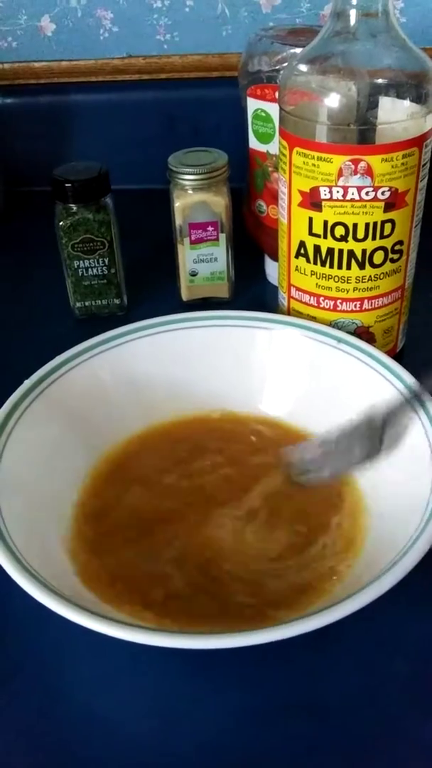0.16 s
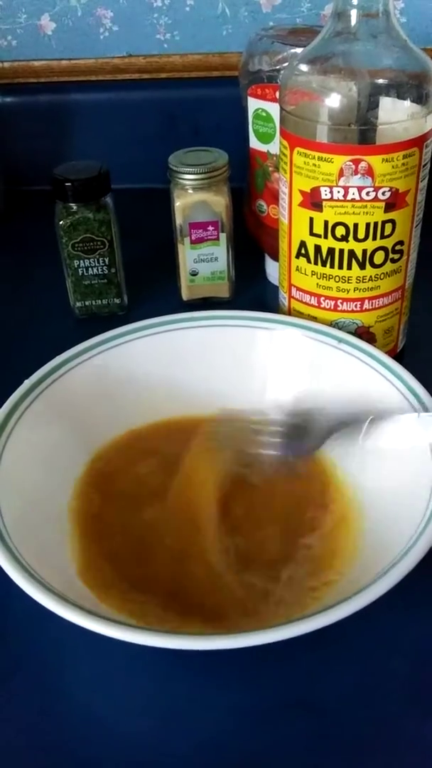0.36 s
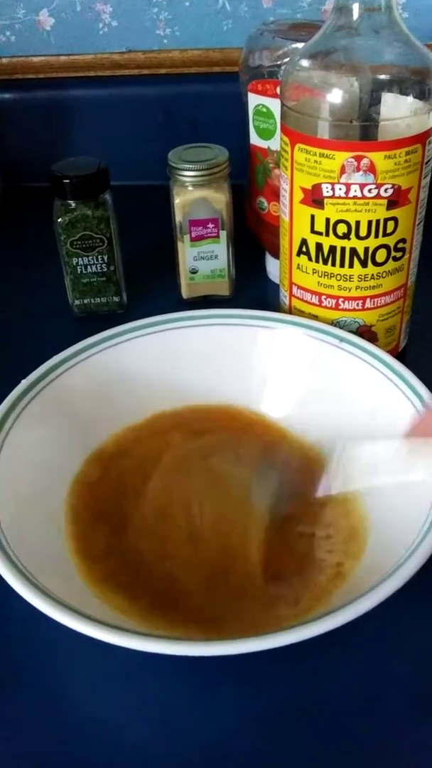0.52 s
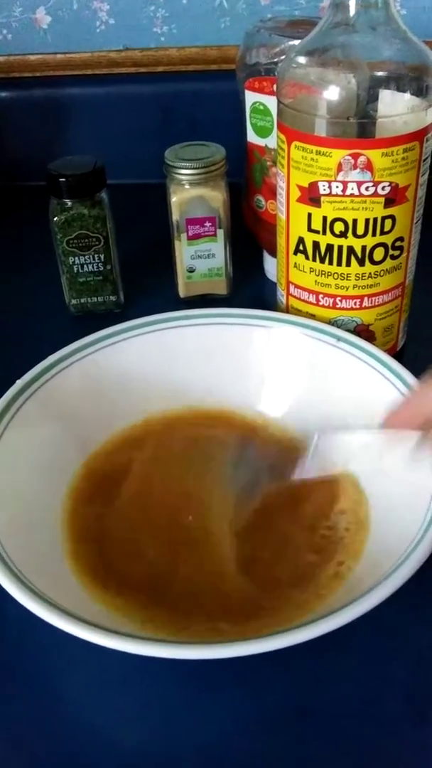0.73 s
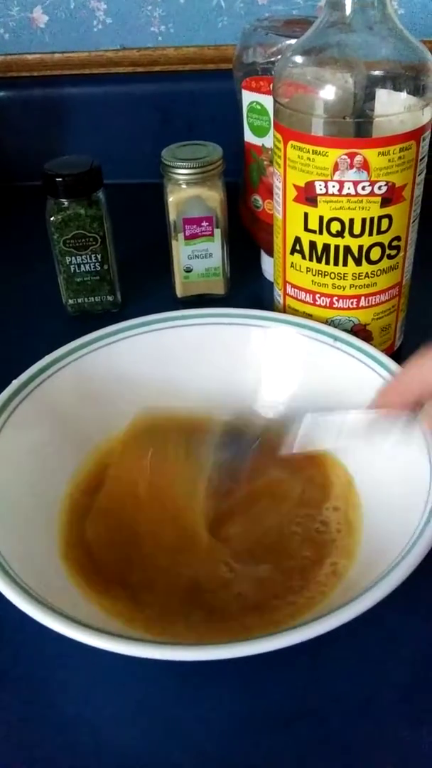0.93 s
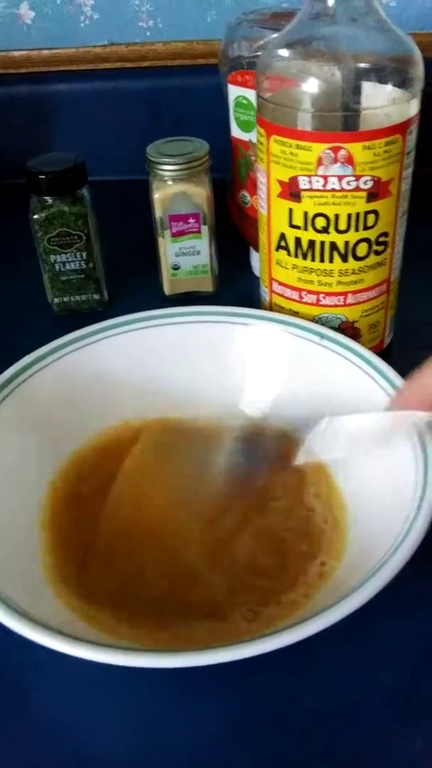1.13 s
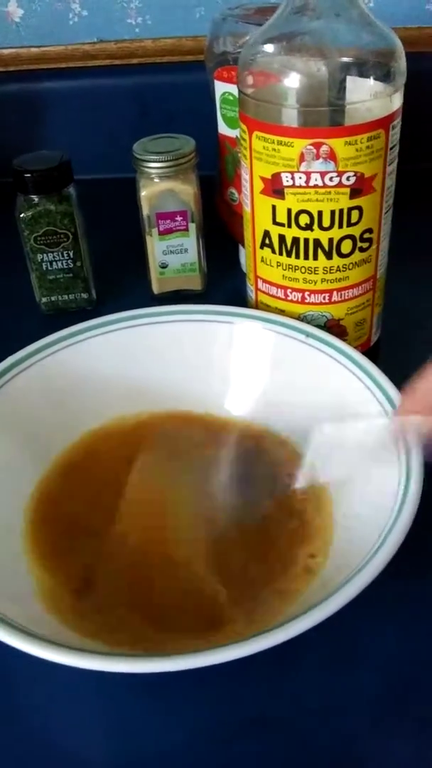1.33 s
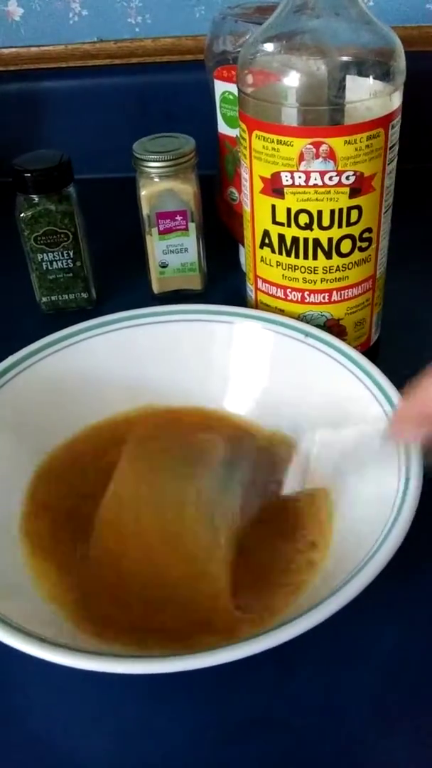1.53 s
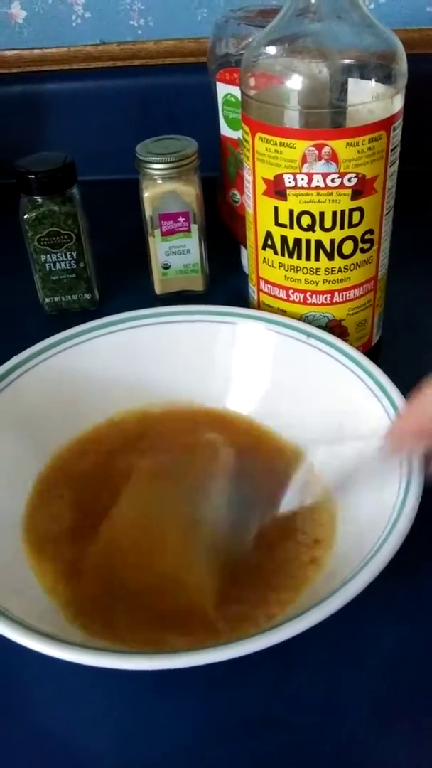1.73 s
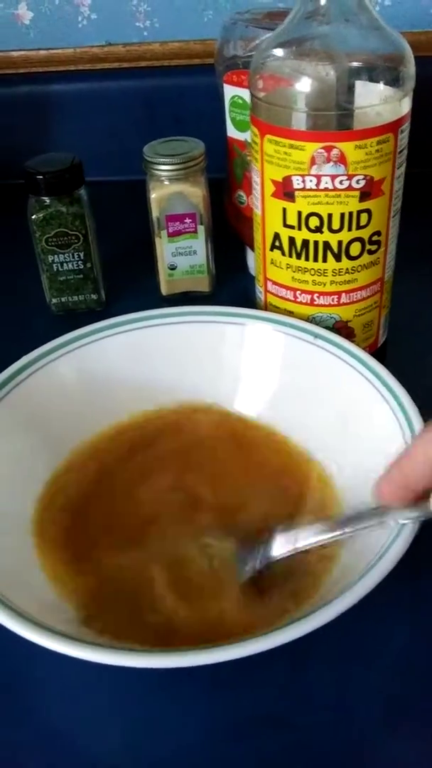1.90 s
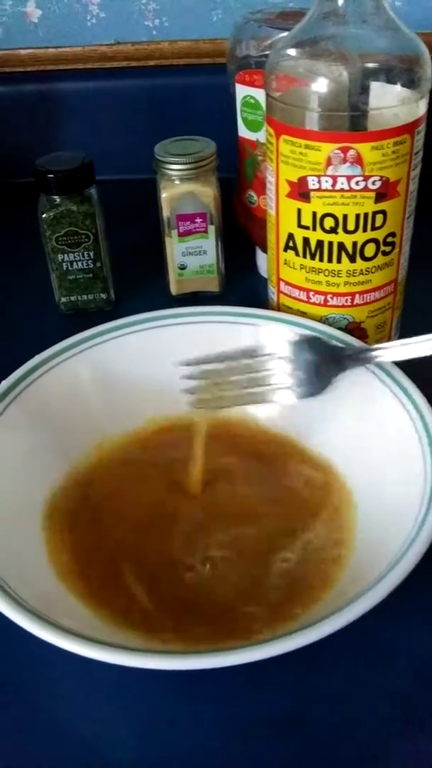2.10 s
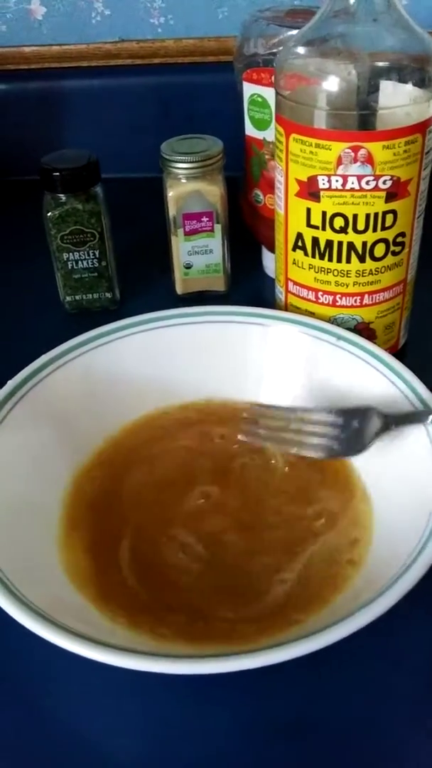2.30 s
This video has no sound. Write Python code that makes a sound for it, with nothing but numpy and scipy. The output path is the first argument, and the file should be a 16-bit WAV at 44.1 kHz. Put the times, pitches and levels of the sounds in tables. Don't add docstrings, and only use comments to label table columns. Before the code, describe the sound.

A metal fork briskly beats eggs in a bowl, clacking and scraping five times a second

```python
import sys
import numpy as np
from scipy import signal
from scipy.fft import rfft, irfft, next_fast_len
from scipy.io import wavfile
from scipy.ndimage import map_coordinates

SR = 44100
rng = np.random.default_rng(int(sys.argv[2]) if len(sys.argv) > 2 else 0)


def amplitude_ratio(level_db):
    exponent = np.asarray(level_db, float) / 20
    return 10 ** exponent


def output_pcm(signal):
    pcm = np.clip(np.atleast_2d(signal).T, -1, 1) * 32767
    wavfile.write(sys.argv[1], SR, np.round(pcm).astype(np.int16))


N = 103635

# length in seconds, pressure in dB at start, pressure in dB at end,
# brightness in dB, tine tips in dB.
SCRAPES = [
    (0.079, -33.5, -37.5, 2, 0),
    (0.075, -27, -40.5, -3, 6),
    (0.073, -25.5, -38.5, 0.5, -7),
    (0.052, -26.5, -34.5, 2, -9.5),
    (0.053, -29, -41, 1.5, -0.5),
    (.088, -32, -40.5, 1.5, 1.5),
    (0.067, -29.5, -39, -1, 2.5),
    (0.08, -37, -34, 3.5, 0.5),
    (0.085, -37, -37, 0, 5),
]
LEAD_IN_S = [.4135, .6045, .800, 1.002, 1.198, 1.4098, 1.617, 1.8203]
# pressure in dB, brightness in dB.
LEAD_INS = [
    (-38, 3),
    (-32.5, -1.5),
    (-53.5, -13),
    (-32, 2.5),
    (-34.5, -4.5),
    (-37.5, -5.5),
    (-29.5, 0),
    (-26, -3.5),
]
# centre in Hz, width in Hz, level in dB.
RUBBED_BOWL = [(1169, 300, -1), (1520, 140, -2.5), (2100, 67, 4.5), (2440, 390, -9), (3148, 900, -7)]
# centre in Hz, width in Hz, level in dB.
RUBBED_TINES = [(4850, 680, -13), (5715, 84, 0.5), (6555, 88, -11.5), (6110, 840, -5), (7250, 410, -3)]
# centre in Hz, width in Hz, level in dB.
RUBBED_TIPS = [(8450, 240, -9.5), (10020, 540, -11), (11900, 440, -6.5), (13070, 510, -14),
               (14700, 1400, -19.5)]
# frequency in Hz, t60 in seconds.
KITCHEN_T60_S = [(300, 0.86), (2000, 0.38), (7300, .3), (8500, 0.3), (15000, 0.25)]
# frequency in Hz, level in dB.
HUM_SPECTRUM = [(30, 1.5), (150, -16), (230, 1), (420, -0.5), (950, -3.5), (1500, -13.5), (4000, -21.5),
                (15500, -30.5)]
BLOW_S = [.2072, .4206, .6177, .8143, 1.0153, 1.2061, 1.4182, 1.6246, 1.8309]
# tines in dB, bowl rim in dB, wall in dB, foot in dB, counter thump in dB.
BLOW_LEVELS = [
    (-10.5, -27, -35.5, -45.5, -32),
    (0, -23.5, -18.5, -14.5, -18.5),
    (-1.5, -18.5, -23.5, -31.5, -15.5),
    (1, -24.5, -32, -36, -18.5),
    (-6.5, -28.5, -26.5, -53, -21),
    (-1, -26.5, -20.5, -31.5, -20.5),
    (-1.5, -33.5, -21.5, -29, -22.5),
    (-2.5, -21.5, -25, -37.5, -21.5),
    (-3.5, -26.5, -25.5, -39, -20),
]
# centre in Hz, width in Hz, level in dB.
CRACK_PEAKS = [(1300, 440, -13), (2950, 790, -4), (6100, 9000, -11), (12000, 5000, -12)]
# frequency in Hz, level in dB, t60 in seconds.
TINE_MODES = [(4624, 1.5, 0.013), (4980, -1.5, 0.012), (5850, -5.5, 0.036), (6125, 9, 0.013),
              (6670, -2, 0.023), (7104, 0, 0.017), (7550, -11.5, 0.037), (8700, -13.5, .015),
              (9460, -10.5, 0.01), (9970, -15, 0.017), (12050, -6, .015), (13360, -13, .012),
              (14600, -3, .01)]
# frequency in Hz, level in dB, t60 in seconds.
RIM_MODES = [(1010, -13, .06), (1120, -7, .075), (1250, 0, .07), (1300, -5, .06), (1560, -6, .095)]
# frequency in Hz, level in dB, t60 in seconds.
WALL_MODES = [(2000, -9, .075), (2115, -9, .07), (2380, -10, .055), (2505, -2, .07), (2630, 0, .075),
              (2820, -11, .06)]
# frequency in Hz, level in dB, t60 in seconds.
FOOT_MODES = [(3340, -7, .06), (3450, -1, .09), (3520, 0, .1), (3600, -1, .085)]
# frequency in Hz, level in dB, t60 in seconds.
THUMP_MODES = [(385, 0, .05), (412, -4, .04)]
TOUCH_S = [.2225, .237, .2565, .271, .2745, .281, .285, .468, .481, .557, .608, 1.276, 1.287, 1.394, 1.4098,
           1.483, 1.689, 1.700, 1.8955, 1.902, 1.912]
# level in dB, brightness in dB.
TOUCH_LEVELS = [(-29, 8), (-35.5, 5.5), (-39.5, 5.5), (-44.5, 4.5), (-25.5, 8), (-31, 9.5), (-34, 5),
                (-33, 6.5), (-33, 5.5), (-36.5, -3), (-22.5, 0), (-36.5, 15), (-35.5, 7), (-58, 7),
                (-21, 0.5), (-29.5, 6), (-37, 10), (-56, 10), (-34.5, 10.5), (-36, 7), (-45, 3)]
# start in seconds, level in dB, pitch in Hz.
BUBBLES = [(1.137, -43, 850), (1.6, -47, 1300), (1.773, -40, 850), (1.783, -40, 700), (1.791, -39, 620),
           (1.7975, -36, 4450), (2.038, -41, 1550), (2.039, -50, 2700), (2.058, -44, 950),
           (2.134, -41, 1130), (2.135, -49, 4900), (2.326, -43, 600)]

RUB_RISE_S, RUB_FALL_T60_S = 0.0017, 0.08
GRIT_DB, RUB_FLUTTER_DB, CLUMP_DB, ANGLE_DB = 2.8, 1.6, 3.2, 2.5
SAG_DB = 2
EARLIER_DB = -43
KITCHEN_DB, KITCHEN_GAP_S = -13, 0.004
HUM_DB = -56
PLACE_DB = 2.5
SLOSH_RAD = 1.7
CRACK_DB, CRACK_T60_S = 11, 0.0018
THUMP_RISE_S = 0.004
TOUCH_DAMPING = 0.9
BUBBLE_CYCLES, BUBBLE_RISE = 12, 0.06
MIC_LOW_HZ, MIC_TOP_HZ = 200, 15900


def unit(x):
    return x / np.sqrt(np.mean(x ** 2) + 1e-20)


def along(points, hz):
    f, v = np.transpose(points)
    return np.interp(np.log(hz + 1), np.log(f + 1), v)


def wobble(rate_hz):
    knots = rng.standard_normal(int(N * rate_hz / SR) + 4)
    return map_coordinates(knots, [np.arange(N) * rate_hz / SR])


def filtered(x, response):
    m = next_fast_len(N + SR // 2)
    return irfft(rfft(x, m) * response(np.fft.rfftfreq(m, 1 / SR)), m)[..., :N]


def resonant(x, peaks):
    def response(f):
        total = 0
        for k, (centre_hz, width_hz, db) in enumerate(peaks):
            loss = 1j * f * width_hz
            total = total + (-1) ** k * amplitude_ratio(db) * loss / (centre_hz ** 2 - f * f + loss)
        return total
    return filtered(x, response)


def add(track, start_s, sound):
    track[round(start_s * SR):][:len(sound)] += sound


def scrapes():
    t = np.arange(N) / SR
    parts = (RUBBED_BOWL, RUBBED_TINES, RUBBED_TIPS)
    slides = [(-0.037, 0.026, EARLIER_DB, EARLIER_DB, 1, -5)]
    slides += [(s, *row) for s, row in zip(BLOW_S, SCRAPES)]
    for s, end_s, (db, bright_db) in zip(LEAD_IN_S, BLOW_S[1:], LEAD_INS):
        slides.append((s, end_s - s, db, db - 8, bright_db, -3))

    drives = np.zeros((len(parts), N))
    for s, length_s, start_db, end_db, bright_db, tips_db in slides:
        u = t - s
        progress = np.clip(u / length_s, 0, 1)
        db = start_db + (end_db - start_db) * progress - SAG_DB * np.sin(np.pi * progress)
        db -= 60 * np.clip(u - length_s, 0, 9) / RUB_FALL_T60_S
        pressure = amplitude_ratio(db) * np.clip(u / RUB_RISE_S, 0, 1)
        drives += pressure * amplitude_ratio([[-bright_db], [bright_db], [bright_db + tips_db]])

    out = 0
    grit = unit(amplitude_ratio(GRIT_DB * wobble(900) + RUB_FLUTTER_DB * wobble(120)))
    for pressure, peaks in zip(drives, parts):
        for peak in peaks:
            noise = rng.standard_normal(N)
            clumps = unit(noise * amplitude_ratio(CLUMP_DB * wobble(59.82) + ANGLE_DB * wobble(6.78)))
            out = out + resonant(3 * pressure * grit * clumps, [peak])
    return out


def kitchen(x):
    out = np.zeros(N + 2 * SR)
    edges = [0] + [round((s - 0.03) * SR) for s in BLOW_S[1:]] + [N]
    for a, b in zip(edges, edges[1:]):
        hz, t, z = signal.stft(rng.standard_normal(SR // 2), SR, nperseg=256)
        decay = amplitude_ratio(-60 * t / along(KITCHEN_T60_S, hz)[:, None])
        tail = signal.istft(z * decay, SR, nperseg=256)[1]
        add(out, a / SR + KITCHEN_GAP_S, signal.fftconvolve(x[a:b], tail / np.linalg.norm(tail)))
    return amplitude_ratio(KITCHEN_DB) * out[:N]


def hum():
    air = unit(filtered(rng.standard_normal(N), lambda hz: amplitude_ratio(along(HUM_SPECTRUM, hz))))
    return amplitude_ratio(HUM_DB + 0.8 * wobble(5.2)) * air


def ring(modes, t, damping=1):
    hz, db, t60_s = np.transpose(modes)[:, :, None]
    luck = rng.standard_normal((len(modes), 2, 1))
    walk = np.cumsum(rng.standard_normal((len(modes), len(t))), 1) / np.sqrt(SR / 10)
    drift = SLOSH_RAD * np.sqrt(hz / 1000) * walk
    tones = np.sin(2 * np.pi * hz * (1 + 0.0039 * luck[:, 0]) * t + drift)
    decay = amplitude_ratio(db + PLACE_DB * luck[:, 1] - 60 * damping * t / t60_s)
    return (decay * tones).sum(0) / np.linalg.norm(amplitude_ratio(db))


def blows():
    out, cracks = np.zeros(N + SR), np.zeros(N + SR)
    t = np.arange(SR // 4) / SR
    onset = 1 - np.exp(-t / 0.00049)
    for s, (tines_db, rim_db, wall_db, foot_db, thump_db) in zip(BLOW_S, BLOW_LEVELS):
        crack = amplitude_ratio(tines_db - 7 + CRACK_DB - 60 * t / CRACK_T60_S) * rng.standard_normal(len(t))
        add(cracks, s, crack)
        rim = amplitude_ratio(rim_db + 1) * ring(RIM_MODES, t) * (1 - np.exp(-t / 0.002))
        wall = amplitude_ratio(wall_db + 4) * ring(WALL_MODES, t)
        foot = amplitude_ratio(foot_db + 2) * ring(FOOT_MODES, t)
        thump = amplitude_ratio(thump_db) * ring(THUMP_MODES, t) * (1 - np.exp(-t / THUMP_RISE_S)) ** 2
        tines = amplitude_ratio(tines_db - 5.5) * ring(TINE_MODES, t)
        add(out, s, (tines + rim + wall + foot) * onset + thump)
    return out[:N] + resonant(cracks[:N], CRACK_PEAKS)


def touches():
    out, t = np.zeros(N + SR), np.arange(SR // 10) / SR
    onset = 1 - np.exp(-t / 0.0004)
    for s, (db, bright_db) in zip(TOUCH_S, TOUCH_LEVELS):
        bowl = ring(WALL_MODES + FOOT_MODES, t, damping=7.5) + 0.31 * ring(RIM_MODES, t, damping=2.9)
        tines = ring(TINE_MODES, t, damping=TOUCH_DAMPING)
        add(out, s, amplitude_ratio(db) * onset * (amplitude_ratio(bright_db) * tines + amplitude_ratio(-bright_db) * bowl))
    return out[:N]


def bubbles():
    out, t = np.zeros(N + SR), np.arange(SR // 20) / SR
    for s, db, hz in BUBBLES:
        u = t * hz / BUBBLE_CYCLES
        tone = np.sin(2 * np.pi * hz * t * (1 + BUBBLE_RISE * u))
        add(out, s, 4 * amplitude_ratio(db) * u * np.exp(-4 * u) * tone)
    return out[:N]


def scene():
    near = blows() + touches() + scrapes() + bubbles()
    return (near + kitchen(near) + hum())[None]


def roll_off(x):
    return signal.sosfilt(signal.butter(12, 16980, fs=SR, output="sos"), x)


def record(dry):
    def microphone(hz):
        bass_cut = (1j * hz / (MIC_LOW_HZ + 1j * hz)) ** 2
        return bass_cut * np.where(hz < MIC_TOP_HZ, 1, 0.12)
    thin = filtered(dry, microphone)
    return roll_off(thin)


dry = scene()
out = record(dry)
output_pcm(out)
```